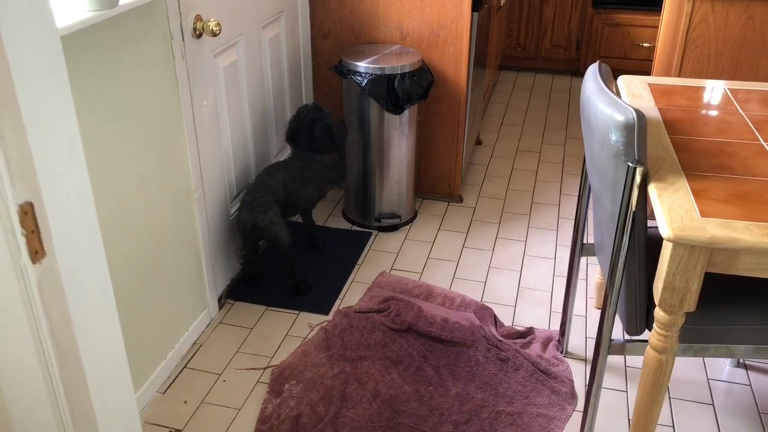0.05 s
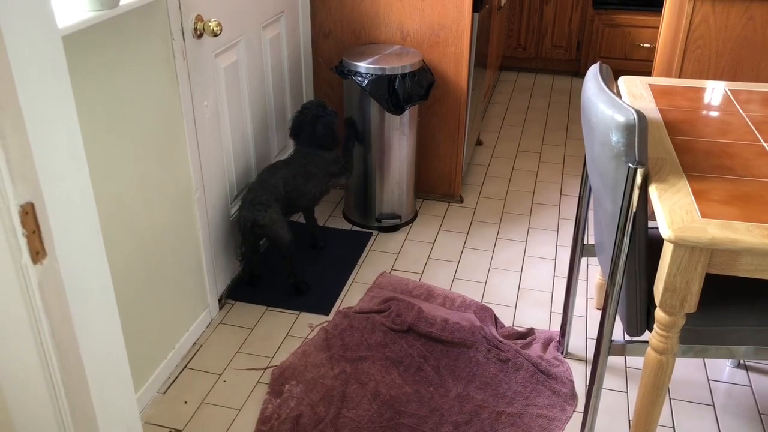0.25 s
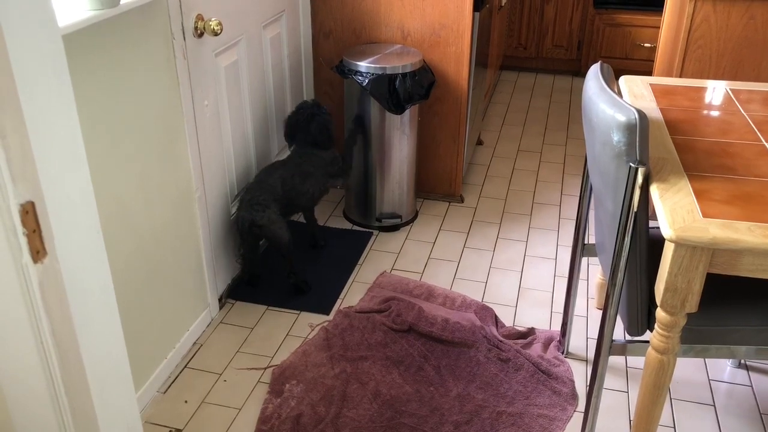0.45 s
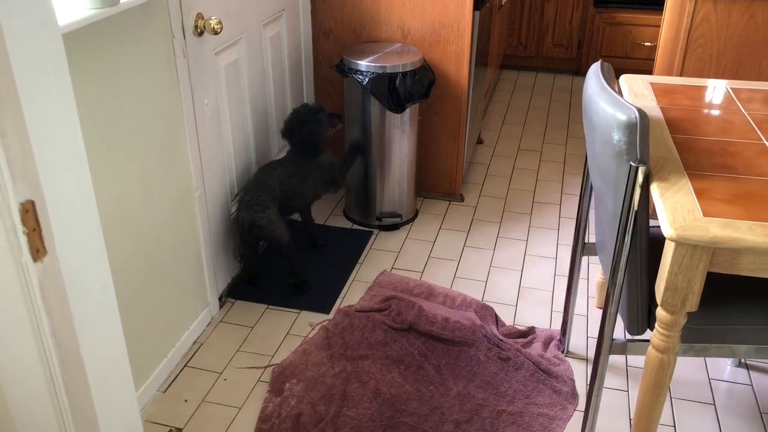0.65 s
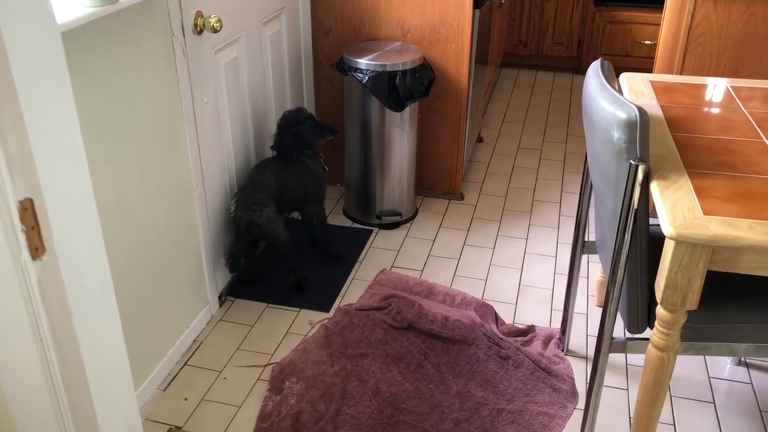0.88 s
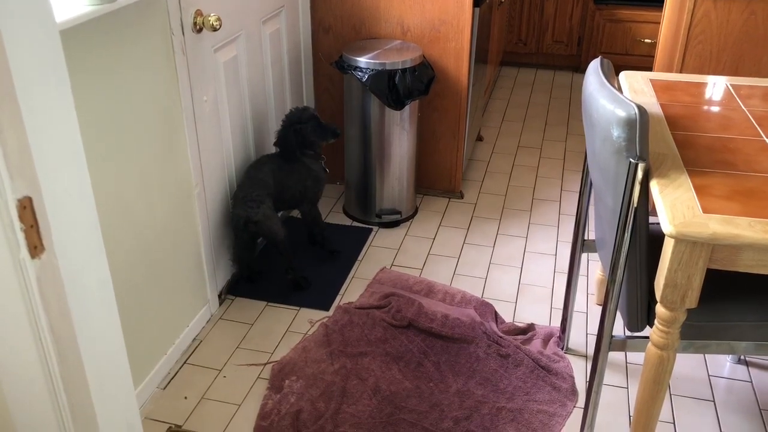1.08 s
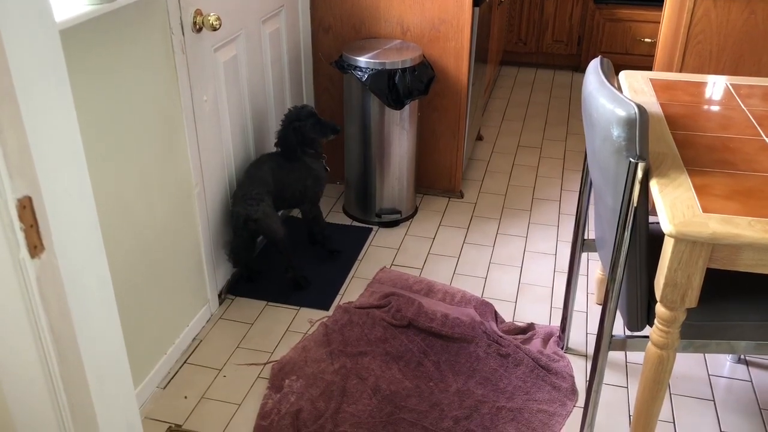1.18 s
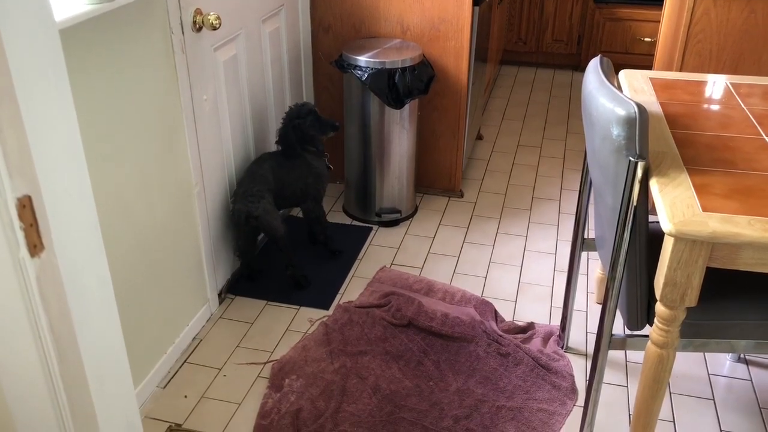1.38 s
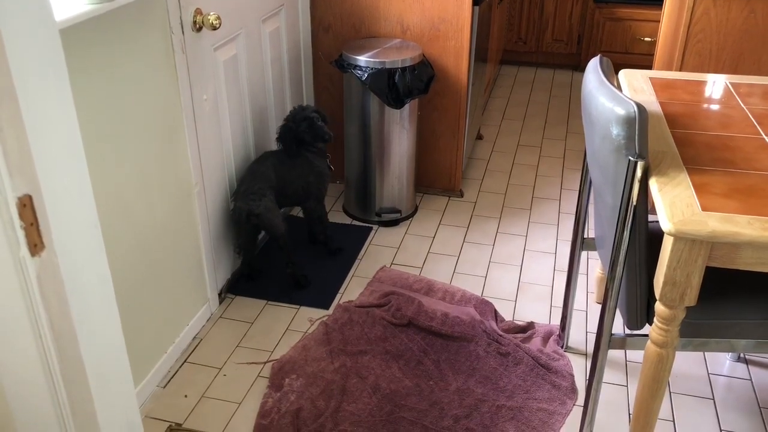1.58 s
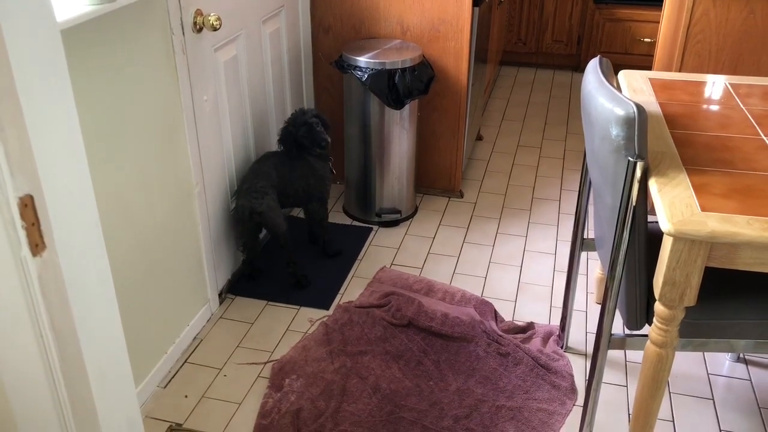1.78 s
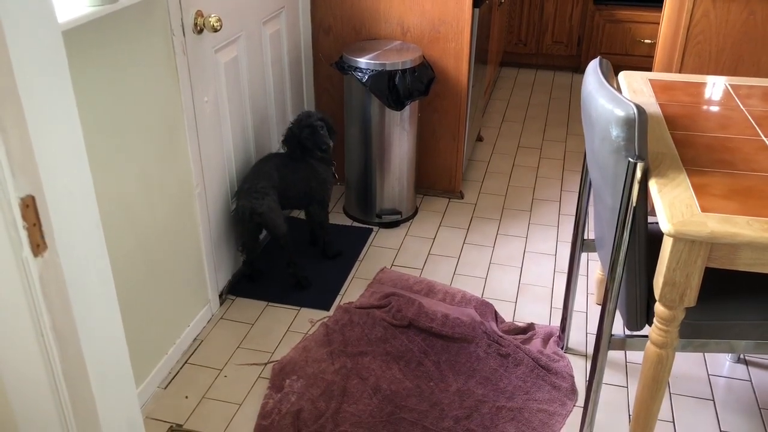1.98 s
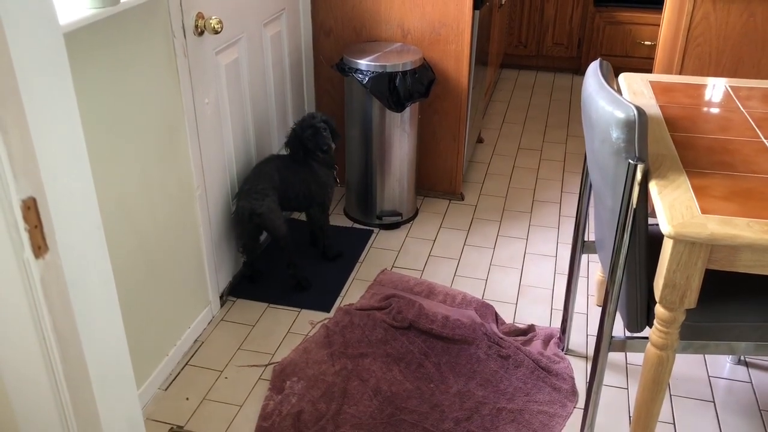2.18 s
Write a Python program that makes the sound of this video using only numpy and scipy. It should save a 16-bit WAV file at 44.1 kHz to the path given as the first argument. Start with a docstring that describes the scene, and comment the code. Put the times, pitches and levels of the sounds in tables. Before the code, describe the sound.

Two rattling metallic bangs from a dog's paw hitting a steel bin in a quiet kitchen.

```python
"""A quiet tiled kitchen: a dog paws twice at a steel pedal bin a few metres away.
Each swipe bangs the bin and sets its lid clattering; shell and hollow can ring on with a slow,
irregular waver. The paw slides down in tiny slips, crinkling the plastic liner and rubbing
the steel. Two very faint groups of high, falling chirps follow over the room's low hum."""
import sys
import numpy as np
from scipy import signal
from scipy.fft import rfft, irfft
from scipy.io import wavfile
from scipy.ndimage import uniform_filter1d

SR = 44100
rng = np.random.default_rng(int(sys.argv[2]) if len(sys.argv) > 2 else 0)


def to_wav(s):
    """Save 16-bit WAV."""
    ch = np.atleast_2d(s).T  # columns
    pcm = np.round(np.clip(ch, -1, 1) * 32767)  # PCM
    wavfile.write(sys.argv[1], SR, pcm.astype(np.int16))


N = 99225

# bin and lid contacts: start_s, crack_db, wash_db, thud_db, tilt_db_per_octave
KNOCKS = [(.238, -26.5, -34.5, -55, 1), (0.2411, -27, -36.5, -55, 1), (0.2457, -32.5, -33.5, -48.5, 1.5),
          (.422, -40, -42.5, -68.5, 1.5), (.445, -55, -45, -69.5, -2), (0.5471, -33.5, -43, -57, -2),
          (0.5527, -26.5, -37, -52.5, 2.5), (0.5604, -27.5, -37, -55.5, -1),
          (.565, -31.5, -38, -54.5, -3.5), (.576, -32.5, -38.5, -58, 2.5), (.589, -33.5, -47, -59, 2.5),
          (0.609, -34, -48, -62, 2.5), (.676, -63, -61, -55.5, -10), (0.708, -67, -51.5, -55.5, -3),
          (.753, -42.5, -49.5, -55.5, 1.5), (.776, -39, -49.5, -54.5, 9)]
# paw strokes: start_s, peak_s, end_s, crinkle_db, rub_db
SLIDES = [(0.323, 0.423, .53, -56.5, -49.5), (0.54, 0.553, 0.62, -42.5, -41.5),
          (0.628, 0.687, 0.767, -62, -45.5), (0.711, 0.784, 0.82, -51.5, -46)]
# modes of steel shell and hollow can: pitch_hz, level_db, t60_s
SHELL_MODES = [(1080, 1, .85), (1213, 2, .8), (1631, 0, .5), (1795, 0, .5), (2127, -1, .4), (2191, 0, .42),
               (2266, 0, .45), (2619, 1, .42), (2707, 0, .42), (2751, 0, .42), (2824, -1, .42),
               (3024, -1, .4), (3413, -2, .35), (3487, -2, .35), (3949, -2, .35), (4334, -1, .35),
               (5737, -2, .35), (5860, -1, .35)]
HOLLOW_MODES = [(171.9, -2.5, .7), (215.4, -2.5, 1.4), (270.6, -0.5, 1.26), (331, -4, 1.5),
                (386.7, -6, 1.1), (475.6, -4.5, 1.49), (733, -3, 0.29)]
# falling whistles: start_s, length_s, start_hz, end_hz, level_db
CHIRPS = [(1.28, 0.097, 4450, 4220, -76), (1.329, 0.092, 3900, 3435, -75.5),
          (1.448, .07, 4300, 3800, -83.5), (1.998, .04, 5350, 5100, -79), (2.019, .11, 4340, 3420, -80)]
# noise spectra: freq_hz, density_db
CRACK_SPECTRUM = [(150, -49), (700, -29.5), (1300, -15), (2200, 1.5), (3200, -3), (4500, -1.5), (6000, 0.5),
                  (7200, -16), (9000, -25.5), (12500, -42), (16000, -47)]
WASH_SPECTRUM = [(150, -40.5), (620, -15.5), (1100, -6), (1500, -5.5), (2200, 1), (3200, -2.5),
                 (4500, -1.5), (6000, -2.5), (7200, -13.5), (9000, -23.5), (12500, -32), (16000, -31)]
THUD_SPECTRUM = [(40, -26), (66, -11), (110, -12), (170, -1), (260, 0), (370, -9), (490, 1), (640, -20),
                 (780, -9.5), (1050, -6.5), (2500, -19), (8000, -56.5)]
CRINKLE_SPECTRUM = [(300, -18), (2000, -0.5), (5000, -3), (7500, 0.5), (10000, -1.5), (13000, -3.5),
                    (16000, -3)]
RUB_SPECTRUM = [(100, -16), (300, -1.5), (480, 0), (650, -6.5), (1050, 3), (1500, 0.5), (2300, 2),
                (3500, -3.5), (6000, -5.5), (7500, -17.5), (16000, -36)]
AIR_SPECTRUM = [(25, -28.5), (48, -18), (68, -4), (100, -6.5), (150, -8.5), (240, -9.5), (450, -14.5),
                (800, -20.5), (1000, -18.5), (1550, -26), (2800, -30), (7000, -34), (16000, -40)]
# kitchen decay: freq_hz, t60_s
KITCHEN_DECAY = [(100, 0.97), (400, .8), (1000, .6), (2200, 0.5), (5000, 0.51), (8000, .42), (16000, 0.23)]

ROOM_RISE_S = 0.0062


def knock(crack_db, wash_db, thud_db, tilt_db_per_octave):
    """One contact: a crack of dense steel modes, its wash in the room, a dull thud."""
    crack_rise_s, crack_decay_s = 0.00061, 0.0088
    thud_rise_s, thud_t60_s = 0.0021, 0.41
    t = np.arange(SR) / SR
    crack, wash, thud = rng.standard_normal((3, SR))
    crack = coloured(crack, tilted(CRACK_SPECTRUM, tilt_db_per_octave))
    crack *= np.exp(-t / crack_decay_s) * (1 - np.exp(-t / crack_rise_s))
    wash = room_decay(coloured(wash, tilted(WASH_SPECTRUM, tilt_db_per_octave)))
    wash *= 1 - np.exp(-t / ROOM_RISE_S)
    thud = coloured(thud, THUD_SPECTRUM)
    thud *= amp(-60 * t / thud_t60_s) * (1 - np.exp(-t / thud_rise_s))
    return amp(crack_db) * crack + amp(wash_db) * wash + amp(thud_db) * thud


def bin_ringing():
    """Knocks and rubbing feed energy to the shell and the hollow can."""
    knock_to_shell_db, knock_to_hollow_db = -20.5, -8
    rub_to_shell_db, rub_to_hollow_db = -3.5, -9.5
    t = np.arange(N) / SR
    shell_power, hollow_power = np.zeros((2, N))
    pulse = np.exp(-t / ROOM_RISE_S) / (ROOM_RISE_S * SR)
    for start_s, _, wash_db, thud_db, _ in KNOCKS:
        add(shell_power, start_s, amp(wash_db + knock_to_shell_db) ** 2 * pulse)
        add(hollow_power, start_s, amp(thud_db + knock_to_hollow_db) ** 2 * pulse)
    for start_s, peak_s, end_s, _, rub_db in SLIDES:
        pressure = np.interp(t, [start_s, peak_s, end_s], [0, 1, 0])
        rub_power = (amp(rub_db) * pressure) ** 2 / SR
        shell_power += amp(rub_to_shell_db) ** 2 * rub_power
        hollow_power += amp(rub_to_hollow_db) ** 2 * rub_power
    return ring_modes(SHELL_MODES, shell_power) + ring_modes(HOLLOW_MODES, hollow_power)


def ring_modes(modes, power):
    """Each mode stores energy and sheds it at its own rate, wavering like close tones beating."""
    waver_rms, waver_band_hz = 0.53, 14
    t, out = np.arange(N) / SR, np.zeros(N)
    lowpass = np.exp(-(np.fft.rfftfreq(N, 1 / SR) / waver_band_hz) ** 2)
    for pitch_hz, level_db, t60_s in modes:
        retention = np.exp(-2 * np.log(1000) / (t60_s * SR))
        energy = signal.lfilter([1], [1, -retention], power)
        swell, drift = (waver_rms * band_noise(lowpass) for _ in range(2))
        phase = 2 * np.pi * (pitch_hz * t + rng.random())
        out += amp(level_db) * np.sqrt(energy) * ((1 + swell) * np.sin(phase) + drift * np.cos(phase))
    return out


def paw_slides():
    """Tiny slips crinkle the liner and rub the steel, swelling and easing with each stroke."""
    slips_per_s, spread_db, direct_db = 1400, 3.5, -4
    t, out = np.arange(N) / SR, np.zeros(N)
    for start_s, peak_s, end_s, crinkle_db, rub_db in SLIDES:
        pressure = np.interp(t, [start_s, peak_s, end_s], [0, 1, 0])
        stroke = np.zeros(N)
        for spectrum, level_db in (CRINKLE_SPECTRUM, crinkle_db), (RUB_SPECTRUM, rub_db):
            sizes = amp(spread_db * np.minimum(rng.exponential(1, N), 3)) * rng.choice([-1, 1], N)
            slips = sizes * (rng.random(N) < slips_per_s / SR)
            stroke += amp(level_db) * pressure * coloured(slips, spectrum)
        out += amp(direct_db) * stroke + kitchen_reverb(stroke)
    return out


def chirps():
    """Thin, wavering, falling whistles, heard only through the room."""
    wobble_rms = 0.062
    out = np.zeros(N)
    for start_s, length_s, start_hz, end_hz, level_db in CHIRPS:
        wobble = wobble_rms * unit(uniform_filter1d(rng.standard_normal(SR), size=30))
        progress = np.arange(0, 1, 1 / (length_s * SR))
        pitch_hz = (start_hz + (end_hz - start_hz) * progress) * (1 + wobble[:len(progress)])
        tone = unit(np.sin(2 * np.pi * np.cumsum(pitch_hz) / SR))
        add(out, start_s, amp(level_db) * np.sin(np.pi * progress) * tone)
    return kitchen_reverb(out)


def kitchen_reverb(x):
    """Diffuse reverberation of the tiled room."""
    tail = room_decay(rng.standard_normal(SR))
    return signal.fftconvolve(x, tail / np.linalg.norm(tail))[:N]


def room_decay(x):
    """Each band fades at the kitchen's rate."""
    freq_hz, t, bands = signal.stft(x, SR, nperseg=256)
    fade = amp(-60 * t / lookup(KITCHEN_DECAY, freq_hz)[:, None])
    return signal.istft(bands * fade, SR, nperseg=256)[1][:len(x)]


def room_tone():
    """Soft air noise and a low wavering hum."""
    hum_hz, hum_width_hz, hum_db, air_db = 65.2, 10, -72.5, -67
    freq_hz = np.fft.rfftfreq(N, 1 / SR)
    hum = band_noise(np.exp(-((freq_hz - hum_hz) / hum_width_hz) ** 2))
    air = coloured(rng.standard_normal(N), AIR_SPECTRUM)
    return amp(air_db) * air + amp(hum_db) * hum


def band_noise(bin_gains):
    """Filtered white noise, rms 1."""
    return unit(irfft(rfft(rng.standard_normal(N)) * bin_gains, N))


def coloured(x, spectrum):
    """x filtered by a spectrum table, rms 1."""
    bin_gains = amp(lookup(spectrum, np.fft.rfftfreq(len(x), 1 / SR)))
    return unit(irfft(rfft(x) * bin_gains, len(x)))


def tilted(spectrum, db_per_octave, pivot_hz=3000):
    """Spectrum table, brightened or dulled."""
    return [(hz, db + db_per_octave * np.log2(hz / pivot_hz)) for hz, db in spectrum]


def lookup(table, freq_hz):
    """Log-frequency interpolation."""
    table_hz, values = np.transpose(table)
    return np.interp(np.log(freq_hz + 1), np.log(table_hz), values)


def amp(db):
    """Decibels to gain."""
    return 10 ** (np.asarray(db) / 20)


def unit(x):
    """Scale to rms 1."""
    return x / np.sqrt(np.mean(x ** 2) + 1e-20)


def add(mix, start_s, sound):
    """Mix in place at start_s."""
    part = mix[max(round(start_s * SR), 0):][:len(sound)]
    part += sound[:len(part)]


def scene():
    """Bin, paw, chirps and room, mono."""
    bangs = np.zeros(N)
    for start_s, *contact in KNOCKS:
        add(bangs, start_s, knock(*contact))
    return (bangs + bin_ringing() + paw_slides() + chirps() + room_tone())[None]


def record(dry):
    """Steep low-pass band limit."""
    cutoff_hz = 15900
    lowpass = signal.firwin(511, cutoff_hz, window=("kaiser", 9), fs=SR)
    return signal.oaconvolve(dry, lowpass[None], "same")


dry = scene()
out = record(dry)
to_wav(out)
```